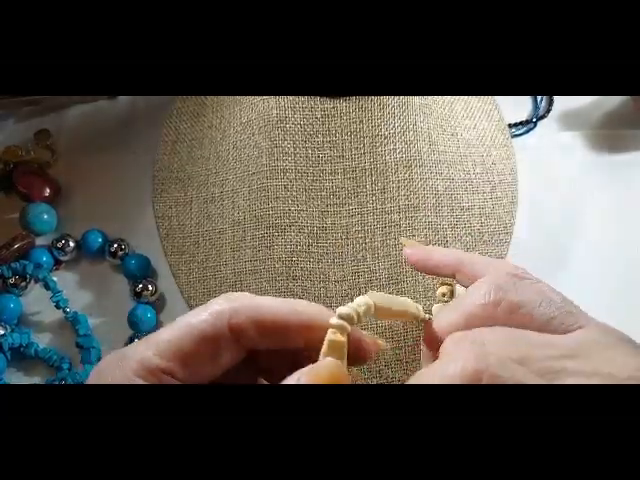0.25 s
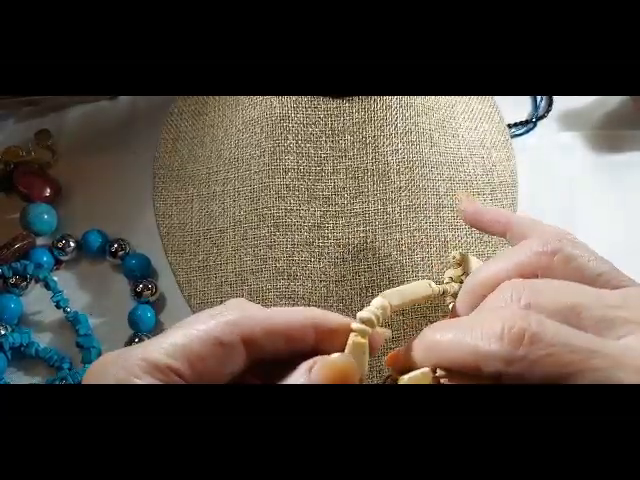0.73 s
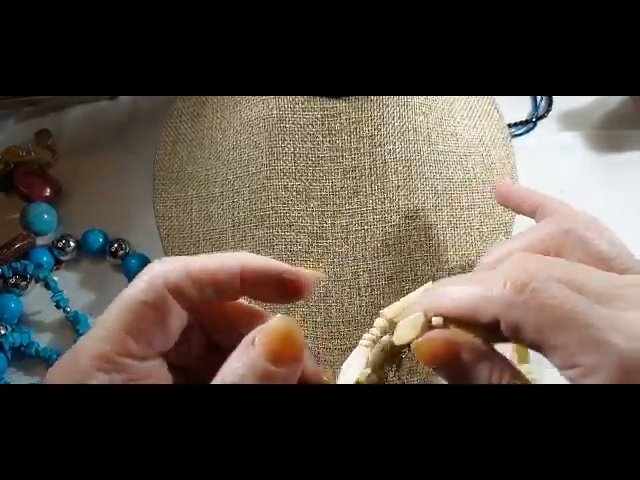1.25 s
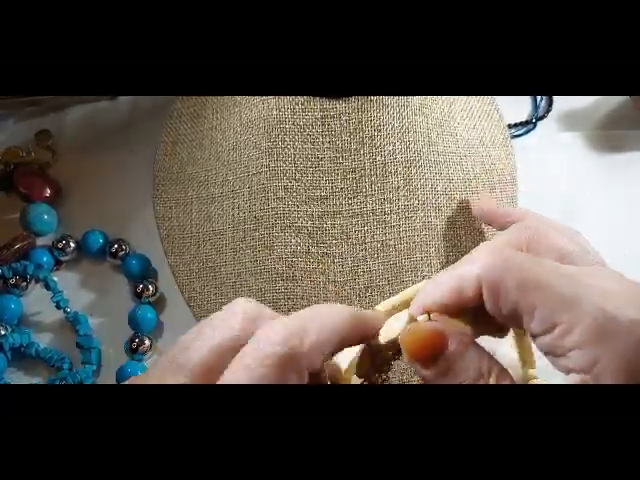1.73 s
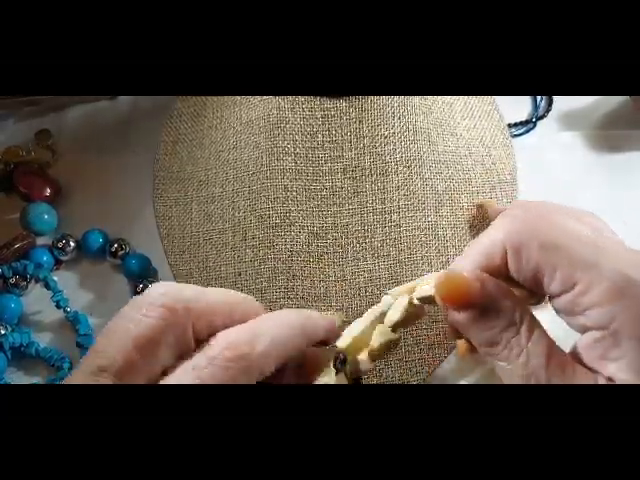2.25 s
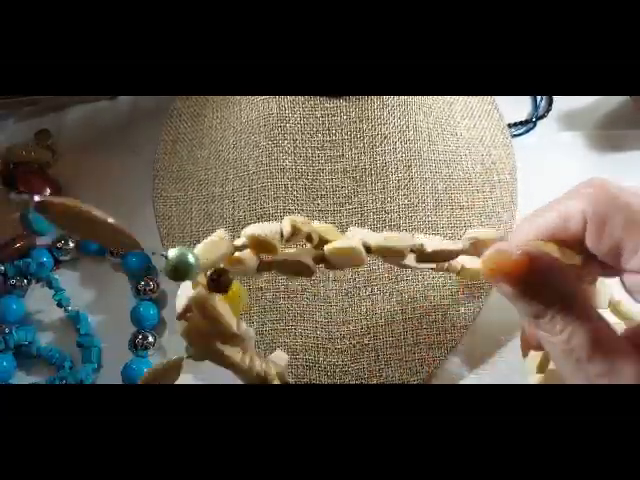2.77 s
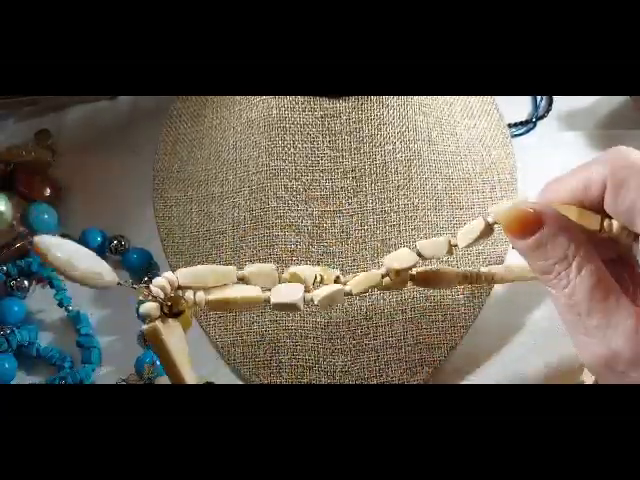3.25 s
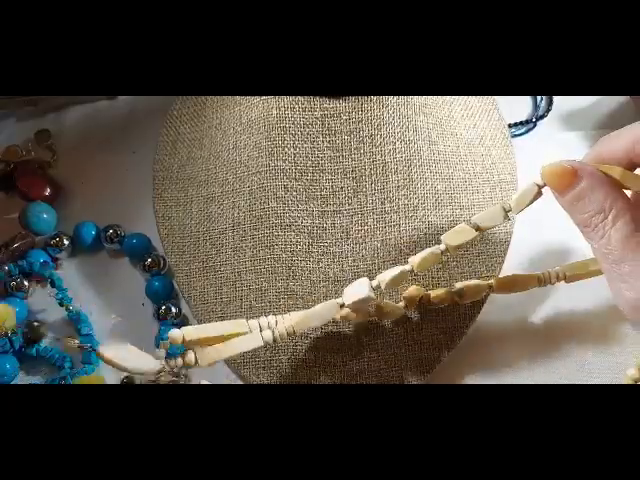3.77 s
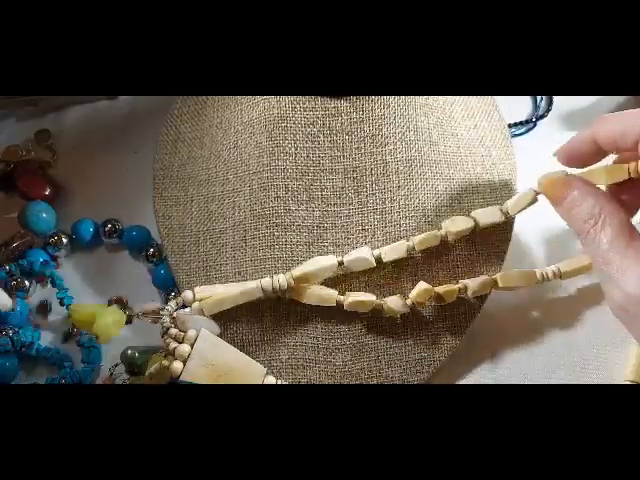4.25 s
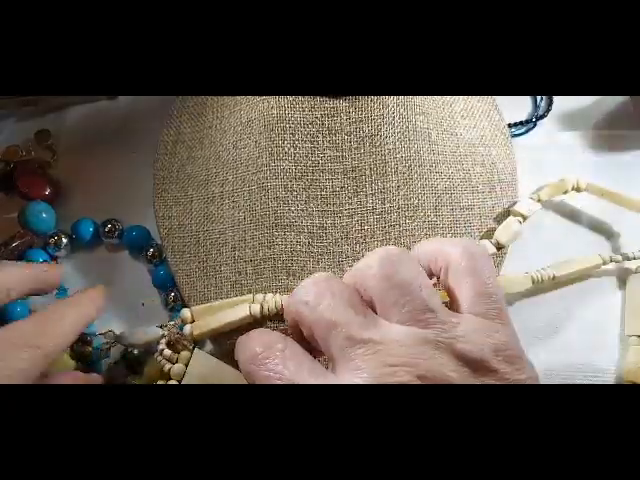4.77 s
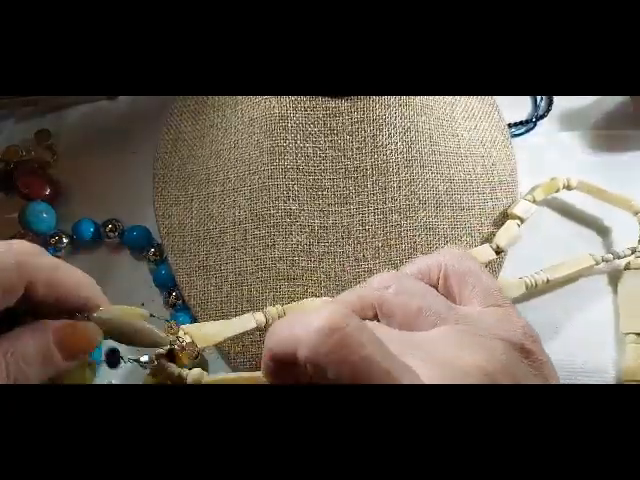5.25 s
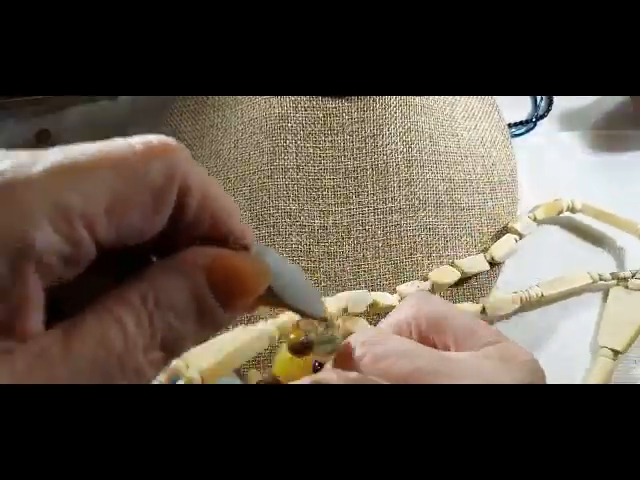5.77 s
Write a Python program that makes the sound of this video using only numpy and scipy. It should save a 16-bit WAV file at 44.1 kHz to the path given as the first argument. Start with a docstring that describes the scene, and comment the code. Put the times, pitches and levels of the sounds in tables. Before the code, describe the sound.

Close, light bead clicks build into bright rattling and a few dull table knocks as hands loosen a necklace, with machinery humming faintly.

```python
"""Untangling a bead necklace

Hands work a necklace loose on a table, close below two microphones, nearer the left one.
Each tug sets off a rattle of impacts: hard beads click and ring, heavy ones scrape and knock,
exciting the modes of the table top. Machines hum and the room rumbles underneath."""
import sys
import numpy as np
from scipy import signal
from scipy.fft import rfft, irfft, next_fast_len
from scipy.io import wavfile
from scipy.ndimage import uniform_filter1d, map_coordinates

SR = 44100
rng = np.random.default_rng(int(sys.argv[2]) if len(sys.argv) > 2 else 0)


def generate_wav(signal):
    """Clip the signal to [-1, 1] and save it as 16-bit WAV at the path in sys.argv[1]."""
    frames = np.transpose(np.atleast_2d(signal))
    scaled = np.clip(frames, -1, 1) * 32767
    pcm = np.round(scaled).astype(np.int16)
    wavfile.write(sys.argv[1], SR, pcm)


N = 265041
TIME_S = np.arange(N) / SR
EDGE_HZ, TOP_HZ = 15900, 17150  # passband edge, upper limit of the sound


def amp(db):
    return 10 ** (np.asarray(db) / 20)


def along(points, hz):
    """Interpolation of (hz, value) points on a logarithmic frequency axis."""
    knots_hz, values = np.transpose(points)
    return np.interp(np.log(hz + 1), np.log(knots_hz + 1), values)


def wobble(rate_hz):
    """Smooth random modulation: a spline through Gaussian knots."""
    knots = rng.standard_normal(int(N * rate_hz / SR) + 4)
    return map_coordinates(knots, [TIME_S * rate_hz])


def filtered(x, response):
    """Linear filtering: the spectrum is multiplied by a frequency response."""
    size = next_fast_len(N + SR // 4)
    return irfft(rfft(x, size) * response(np.fft.rfftfreq(size, 1 / SR)), size)[..., :N]


def coloured(x, spectrum):
    """Spectral shaping that conserves the power of white noise."""
    power = np.mean(amp(along(spectrum, np.linspace(0, SR / 2, num=400))) ** 2)
    return filtered(x, lambda hz: amp(along(spectrum, hz)) / np.sqrt(power))


def noise_field(spectrum):
    """Partial coherence: stereo noise of unit rms, most alike at both microphones in the bass."""
    # frequency_hz, left_right_correlation
    coherence = [(60, 0.9), (180, 0.72), (550, 0.71), (1650, 0.043), (4970, -0.066), (15000, -0.39)]

    def response(hz):
        angle = np.arccos(along(coherence, hz)) / 2
        return amp(along(spectrum, hz)) * [np.cos(angle), np.sin(angle)]

    mid, side = filtered(rng.standard_normal((2, N)), response)
    stereo = np.array([mid + side, mid - side])
    return stereo / np.sqrt(np.mean(stereo ** 2))


def scatter(x, t60_s, delay_s):
    """Diffuse reverberation: noise follows the source's power, stored and decaying exponentially."""
    fall = amp(-120 / (t60_s * SR))
    power = signal.lfilter([1 - fall], [1, -fall], np.mean(x ** 2, axis=0))
    delayed = np.roll(uniform_filter1d(power, size=40), round(delay_s * SR))
    return amp([[1.5], [-1.5]]) * np.sqrt(np.abs(delayed)) * rng.standard_normal((2, N))


def rattle_levels():
    """Incoherent addition: the tugs sum in power to a rattle level and its long-bead part, in dB."""
    # tugs on the string: peak_s, level_db, swell_s and decay_s (per 20 dB), long_share_db
    tugs = [(0.01, -63.5, .1, 0.19, -7), (.2, -71.5, 0.25, .15, 1), (.57, -75, 0.045, 0.13, 2.5),
            (1.02, -71, 0.075, 0.14, 0.5), (1.1, -65, .1, 0.17, -1), (1.211, -61.5, 0.12, 0.064, -2),
            (1.345, -58.5, .02, 0.12, -6), (1.525, -59.5, 0.12, 0.12, -4), (1.708, -65, 0.072, .15, -2),
            (1.802, -56.5, .08, 0.085, -9), (2.013, -54, 0.1, 0.073, -5.5),
            (2.331, -59, 0.097, 0.089, -5.5), (2.432, -46, .02, 0.13, -14.5),
            (2.6, -51.5, 0.21, 0.032, -3.5), (2.66, -51.5, 0.016, 0.36, -7.5),
            (2.814, -44.5, 0.074, 0.17, -5), (2.919, -40.5, 0.081, 0.19, -8),
            (3.087, -38.5, 0.27, 0.089, -7.5), (3.269, -52.5, 0.026, 0.072, 0),
            (3.524, -42.5, 0.097, 0.076, -12.5), (3.626, -44.5, .12, 0.067, -2.5),
            (3.763, -56.5, .15, .15, -13), (3.849, -47.5, 0.041, 0.077, -9),
            (3.975, -58.5, 0.011, .11, -5.5), (4.121, -46.5, 0.015, .03, -13.5),
            (4.216, -42, 0.033, 0.079, -5), (4.35, -59.5, .12, .1, -7), (4.516, -37, 0.08, 0.12, -7.5),
            (4.61, -48.5, .05, 0.2, -3.5), (4.751, -41, 0.077, 0.097, -10.5), (5.015, -42, 0.014, .04, -12),
            (5.11, -53, 0.13, 0.066, -9.5), (5.226, -51, 0.055, 0.064, -13), (5.33, -57.5, 0.14, .1, -10),
            (5.42, -53, .12, 0.092, -5), (5.517, -37.5, 0.13, 0.066, -5.5), (5.579, -42, .05, 0.047, -2.5),
            (5.745, -50, 0.3, 0.015, -8), (5.795, -44, 0.008, 0.12, -6), (5.91, -52, 0.057, 0.31, -5)]
    peak_s, level_db, swell_s, decay_s, long_share_db = np.transpose(tugs)[..., None]
    t = np.arange(0, N / SR + .01, .001)
    drop_db = 20 * np.where(t < peak_s, (peak_s - t) / swell_s, (t - peak_s) / decay_s)
    rest_db, long_linger = -90.5, 1.195

    def total(db):
        power = np.sum(amp(db) ** 2, axis=0) + amp(rest_db) ** 2
        return np.interp(TIME_S, t, 10 * np.log10(power))

    return total(level_db - drop_db), total(level_db + long_share_db - drop_db / long_linger)


def rumble(rattle_db):
    """Broadband vibration: room rumble adds in power to the shaking of the table by the tugs."""
    # two rumble spectra: frequency_hz, density_db
    low_band = [(15, -40.5), (28, -12), (45, -3.5), (85, -1), (105, -6.5), (135, -3.5), (160, -12),
                (222, -7.5), (250, -10.5), (305, -10), (340, -19.5), (450, -26), (700, -50)]
    upper_band = [(250, -31.5), (420, 1), (700, -5.5), (1100, -11), (2000, -17), (3000, -29), (5000, -38)]
    shake_power = np.abs(uniform_filter1d(amp(rattle_db) ** 2, round(.2 * SR)))
    low = np.sqrt(amp(-53.5) ** 2 + amp(-11) ** 2 * shake_power) * amp(.66 * wobble(6.1))
    upper = np.sqrt(amp(-74) ** 2 + amp(-26.5) ** 2 * shake_power) * amp(.5 * wobble(2.8))
    return low * noise_field(low_band) + upper * noise_field(upper_band)


def motor(start_hz=64.5, sag_hz_per_s=.9):
    """Amplitude and frequency modulation: a motor's low tone wavers and slowly sinks."""
    # envelope of the tone: time_s, level_db
    levels = [(0.0, -71), (0.06, -52), (0.72, -46.5), (0.89, -57), (1.32, -47), (1.89, -50.5), (2.39, -46),
              (2.53, -53), (3.11, -53), (3.18, -42.5), (3.3, -63), (3.36, -49.5), (3.8, -51), (3.9, -65),
              (3.95, -46), (4.44, -49.5), (4.65, -65), (4.84, -45), (4.97, -59.5), (5.12, -45.5),
              (5.27, -59), (6.01, -58.5)]
    level_db = np.interp(TIME_S, *np.transpose(levels)) + 1.67 * wobble(10)
    pitch_hz = start_hz - sag_hz_per_s * TIME_S + .84 * wobble(7)
    return np.sqrt(2) * amp(level_db) * np.sin(2 * np.pi * np.cumsum(pitch_hz) / SR)


def mains_hum(pitch_hz=119.6, beat_hz=1.966, beat_peak_s=3.02):
    """Beating: two hums close in pitch interfere, more deeply as the weaker one grows."""
    phase = 2 * np.pi * np.cumsum(pitch_hz + .5 * wobble(6.08)) / SR
    beat_phase = 2 * np.pi * beat_hz * (TIME_S - beat_peak_s)
    second = amp(-14 + 1.38 * TIME_S) * np.sin(phase + beat_phase)
    return amp(-50.5 + 1.35 * wobble(8)) * (np.sin(phase) + second)


def mat_rub(start_s=.136, hold_s=.042, rise_db_per_s=2500, fall_db_per_s=350):
    """Dry friction: one short rub on the mat, noise in two broad resonances."""
    # rub spectrum: frequency_hz, density_db
    mat = [(500, -28), (1000, -5), (1300, 1), (1600, -14), (2800, -30), (4100, -3), (4800, -12),
           (8000, -40)]
    t = TIME_S - start_s
    drop_db = rise_db_per_s * np.maximum(-t, 0) + fall_db_per_s * np.maximum(t - hold_s, 0)
    return amp(-67.5 - drop_db + 2.5 * wobble(63)) * noise_field(mat)


def table_knocks(attack_s=.00082):
    """Modal vibration: each blow of a heavy bead excites the table's damped modes at new strengths."""
    # blows: start_s, thud_db, body_db, knock_db, ring_db, decay_time_ratio
    blows = [(2.612, -52, -61, -72, -57, 0.9), (3.049, -54.5, -37, -49, -39.5, 0.62),
             (3.054, -43.5, -39, -42, -32, 0.7), (3.0639, -57, -24.5, -37, -20, 0.38),
             (3.067, -28, -35.5, -29, -29.5, 0.82), (3.079, -35, -43, -59, -41, 0.76),
             (3.602, -42, -50, -50, -54.5, 0.64), (3.617, -39, -52, -52, -51, 0.94),
             (4.176, -46, -51.5, -53, -53.5, 1.24), (4.226, -39.5, -34.5, -33.5, -41, 0.88),
             (4.235, -39.5, -35.5, -42, -58, 0.41), (4.535, -41, -57, -65, -55, 0.77),
             (4.585, -44, -51.5, -69, -55, 0.81), (4.758, -54, -50, -63, -85, 0.95),
             (5.52, -48, -57, -64, -65, 0.85), (5.868, -58, -37, -45, -43, 1.05),
             (5.919, -45, -45.5, -53, -51, 0.99), (6.0, -61, -51, -58, -46, 0.82)]
    # modes of the table top: pitch_hz, level_db, t60_s
    modes = [(135.3, 2, .12), (196, 3.5, 0.073), (394, 7, 0.061), (465, 0.5, 0.046), (558, -4.5, 0.051),
             (758, 1.5, 0.07), (995, -2.5, 0.037), (1123, 4.5, 0.035), (1211, -3.5, 0.052),
             (1360, -7.5, 0.042), (1930, -9.5, 0.054), (2310, -8.5, 0.032), (2900, -14.5, .03)]
    pitch_hz, level_db, t60_s = np.transpose(modes)[..., None]
    band = np.searchsorted([250, 650, 900], pitch_hz)  # thud, body, knock or ring
    out, t = np.zeros((2, N + SR)), np.arange(SR // 4) / SR
    for start_s, *band_db, decay_ratio in blows:
        strength, detune = rng.standard_normal((2, len(modes), 1))
        mode_db = np.take(band_db, band) - 3 + level_db + 2.46 * strength
        envelopes = amp(mode_db - 60 * t / (decay_ratio * t60_s))
        tones = envelopes * np.sin(2 * np.pi * pitch_hz * (1 + .013 * detune) * t)
        out[:, round(start_s * SR):][:, :len(t)] += tones.sum(axis=0) * (1 - np.exp(-t / attack_s))
    direct = out[:, :N] * amp([[.8], [-.8]])
    echo = scatter(direct, t60_s=.25, delay_s=.0076)
    echo_spectrum = [(80, -14), (150, 7), (1200, -9), (2500, -18), (5000, -71.5)]
    return direct + amp(-10) * coloured(echo, echo_spectrum)


def reflections(x):
    """Scattering: a quick return from table and hands, a longer one from the walls."""
    near = amp(-10) * scatter(x, t60_s=.027, delay_s=.0014)
    return near + amp(-17.5) * scatter(x, t60_s=.17, delay_s=.00446)


def contacts(start_s, level_db, pan_db, shapes):
    """Superposition of impacts; the longer path to the right microphone delays them by 9 samples."""
    index = np.round(start_s * SR).astype(int)[:, None] + np.arange(shapes.shape[-1])
    channels = []
    for shape, side, lag in zip(shapes, (.5, -.5), (0, 9)):
        gain = 4 * amp(level_db + side * pan_db) / np.linalg.norm(shape, axis=1)
        channels.append(np.bincount((index + lag).ravel(), (shape * gain[:, None]).ravel(), N)[:N])
    return np.array(channels)


def cracks(count, snap_db, snap_t60_s, wake_t60_s):
    """Impact transients: a snap and its noisy wake; shadowing weakens the snap on the right."""
    t = np.arange(256) / SR
    noise = rng.standard_normal((count, 2, len(t))).transpose(1, 0, 2)
    snap = amp(np.reshape(snap_db, (2, 1, 1)) - 60 * t / snap_t60_s)
    return np.sign(noise[0]) * snap + noise * amp(-60 * t / wake_t60_s)


def rings(pitch_hz, decay_s, spread):
    """Damped free vibration: a bead rings briefly with one main tone and a weaker one nearby."""
    t = np.arange(384) / SR
    offset, detune, linger = rng.random((len(pitch_hz), 3)).T[..., None]
    phase = 2 * np.pi * np.array([np.zeros_like(offset), offset - .5])  # left, right
    nearby_hz = np.minimum(pitch_hz[:, None] * np.exp(spread * (detune - .5)), EDGE_HZ)
    tone = np.sin(2 * np.pi * pitch_hz[:, None] * t + phase)
    tone += .5 * np.sin(2 * np.pi * nearby_hz * t - phase)
    t60_s = decay_s * (1.24 + linger)
    return tone * amp(-60 * t / t60_s) * (1 - t / t[-1])


def friction(long_rattle_db):
    """Sliding friction: long beads slip through the fingers, heavy ones scrape in the hardest tugs."""
    slide = amp(-80 + .8 * (long_rattle_db + 70) + 2.5 * wobble(70)) * rng.standard_normal((2, N))
    scrape = amp(-60 + 1.4 * (long_rattle_db + 45) + 2.9 * wobble(60)) * rng.standard_normal(N)
    return slide, scrape


def beads(rattle_db, long_rattle_db, tiny_count=3300):
    """Impact excitation: clear clicks and a dense random rattle sound small, long and heavy beads."""
    # clear clicks: start_s, level_db, left_over_right_db, long_share_db, long_pitch_hz
    clicks = [(0.013, -43.5, 13.5, -30, 7150), (0.0276, -50, 4, -16, 7050), (0.096, -53.5, 1, 0.5, 6200),
              (0.2992, -54.5, 2, -5, 7540), (0.5457, -54, 3, -12, 3400), (1.0877, -42, 3, -18, 4620),
              (1.1006, -37, 7, -7.5, 5400), (1.1359, -44.5, 3, -8, 5440), (1.1781, -27, 4, -20, 7340),
              (1.1817, -43, 1, -14, 5100), (1.2024, -35.5, 8, -8, 6300), (1.2141, -38, 6, -9, 6370),
              (1.3377, -38, 5, -19, 6800), (1.3529, -47, 3, -12, 5470), (1.4476, -44, 4, -13, 4600),
              (1.4915, -42, 7, -20, 5060), (1.5199, -48, 7, -21, 7480), (1.5266, -47, 8, -13, 7140),
              (1.6573, -45, 5, -10, 6900), (1.684, -39, 1, -20, 7470), (1.702, -40, 1, -13, 5640),
              (1.712, -44, 0, -11.5, 7310), (1.7721, -46, 3, -10.5, 6940), (1.9589, -44, 2, -9, 7250),
              (1.9746, -43, 4, -12, 7140), (2.0044, -44.5, 5, -8.5, 4530), (2.0126, -36.5, 1, -9.5, 5400),
              (2.0254, -46, 4, -9, 7160), (2.0522, -49, 1, -11, 4810), (2.2463, -45, 6, -23, 7490),
              (2.2627, -42, 1, -24, 2400), (2.3048, -49, -1, -20, 7490), (2.3263, -42, 5, -20, 7080),
              (2.3342, -33, 5, -20, 7240), (2.4237, -29, 7, -24, 6700), (2.4284, -35, -4, -16, 6660),
              (2.436, -34, 0, -19, 7350), (2.5077, -36.5, 1, -8, 7060), (2.5198, -27.5, 4, -19, 7120),
              (2.567, -37, 6, -19, 4510), (2.5919, -29, 10, -17, 5400), (2.651, -35.5, 7, -12, 4870),
              (2.6546, -28.5, 2, -17.5, 4820), (2.745, -34.5, 10, -17, 7040), (2.7507, -30, 2, -26, 5180),
              (2.7735, -32, 8, -26, 7070), (2.7895, -32.5, 9, -22, 4640), (2.7997, -28, 6, -25, 5340),
              (2.8114, -25.5, 5, -17, 7190), (2.8195, -29, 7, -14, 3870), (2.835, -27, 2, -25, 4870),
              (2.841, -26, 4, -13.5, 4830), (2.8906, -26.5, 1, -14.5, 7410), (2.8994, -28, 8, -23, 7160),
              (2.911, -25, 0, -13, 6920), (2.9197, -21, 9, -16, 6120), (2.9258, -24, 9, -25, 7260),
              (2.94, -26.5, 12, -12, 7490), (2.972, -28, 6, -12, 7540), (2.9972, -21.5, 8, -25, 6200),
              (3.0343, -33, 11, -20, 5030), (3.042, -29, 7, -15, 6290), (3.0749, -30, -1, -11, 5670),
              (3.0798, -28, 7, -18, 7170), (3.0873, -16.5, 9, -15.5, 6800), (3.0946, -30, 9, -16, 5000),
              (3.1003, -32, 1, -10, 6900), (3.111, -27, 7, -17, 6890), (3.1192, -23.5, 6, -15.5, 7300),
              (3.1992, -25, 2, -23.5, 5030), (3.2522, -38, 5, -14, 6300), (3.2558, -31, 9, -15, 6460),
              (3.262, -33, 11, -22, 6100), (3.2706, -33, 3, -25, 6120), (3.3089, -36, 9, -21, 5030),
              (3.4274, -34, 7, -18, 7250), (3.4744, -38, 12, -27, 4970), (3.4866, -33, 5, -23, 5600),
              (3.5145, -25.5, 4, -15, 7300), (3.5187, -21, 3, -18, 7100), (3.5648, -26, 2, -22, 6800),
              (3.575, -29, -1, -14, 5490), (3.582, -35, 8, -17, 6210), (3.5978, -22, 1, -18.5, 5900),
              (3.6024, -24, 2, -27, 6300), (3.6113, -32, 0, -10, 4300), (3.617, -25, 7, -19, 7490),
              (3.6272, -20, 8, -12, 4630), (3.6305, -29, 3, -14, 3490), (3.6392, -36, 3, -15, 6090),
              (3.6469, -31, 6, -25, 7130), (3.662, -21, 0, -18, 5530), (3.7057, -36.5, 6, -32, 4660),
              (3.7407, -37, 4, -25, 5430), (3.75, -39, 3, -26, 7050), (3.7702, -40, 15, -29, 5490),
              (3.833, -38, 9, -27, 6340), (3.8413, -38, 7, -22, 6440), (3.8494, -34, 10, -22, 6520),
              (3.8603, -29, 11, -21, 6510), (3.9043, -43.5, 7, -17, 5790), (3.9674, -34.5, 10, -4.5, 7300),
              (4.1144, -35, 5, -20, 5490), (4.1229, -36, 5, -16, 6750), (4.1696, -29, 3, -14.5, 6160),
              (4.2112, -20.5, 2, -16, 3280), (4.215, -16, 10, -15, 3230), (4.2177, -24, 8, -14, 4260),
              (4.223, -27, 6, -20, 4600), (4.2651, -25, 2, -29, 7030), (4.2706, -34, 3, -16, 4950),
              (4.3068, -40, 10, -24, 6200), (4.3156, -41, 6, -16, 5260), (4.338, -27, 5, -30, 7000),
              (4.3551, -38.5, 13, -27, 7200), (4.4552, -35, 9, -20, 6610), (4.4666, -37, 6, -18, 5360),
              (4.4729, -27, 8, -5, 6150), (4.487, -34, 3, -15, 3530), (4.4934, -28.5, 11, -17, 7080),
              (4.5084, -24, 13, -26, 4800), (4.5145, -30, 9, -17, 5880), (4.5173, -25, 8, -28, 7460),
              (4.5232, -26, 9, -13.5, 7450), (4.5395, -29, 7, -13, 6800), (4.543, -28.5, 6, -7, 4710),
              (4.5882, -31.5, 15, -1.5, 3430), (4.5974, -26, 8, -15, 6970), (4.6028, -41, 7, -15, 5350),
              (4.6184, -28, 8, -11, 3100), (4.7376, -25, 7, -25, 5280), (4.7435, -26, 9, -20, 5170),
              (4.7476, -25, 1, -19, 7070), (4.75, -28.5, 10, -20, 7380), (4.7595, -17.5, 13.5, -18, 7320),
              (4.7618, -30, 3, -16, 7200), (4.769, -26, 6, -16, 6780), (4.7733, -26, 1, -22, 5910),
              (4.7766, -32, 4, -12, 6030), (4.7851, -33.5, 2, -16, 4970), (4.9253, -43.5, 14, -25, 7190),
              (4.9546, -43.5, 13, -8.5, 7110), (4.9957, -32, 4, -16.5, 5800), (5.0014, -36, 7, -23, 5110),
              (5.0062, -39, 6, -16, 5540), (5.014, -39.5, 7, -1.5, 6670), (5.017, -26, 2, -10, 6800),
              (5.0208, -40, 2, -13, 5900), (5.0568, -43, 4, -15, 7240), (5.088, -37.5, 11, -23, 6260),
              (5.2263, -38, 5, -23, 7350), (5.2322, -29.5, 9, -21.5, 5370), (5.2753, -31.5, 7, -26, 4640),
              (5.3044, -40, 10, -15, 7490), (5.329, -38, 9, -14, 7490), (5.4482, -16, 11.5, -28, 5280),
              (5.4599, -26, 9, -21, 7440), (5.4686, -29, 9, -13, 3810), (5.4968, -27, 2, -6, 3320),
              (5.5012, -21.5, 7, -17, 6650), (5.5153, -22, 7, -6.5, 4780), (5.5185, -25.5, 7, -7, 4900),
              (5.5226, -19, 7, -10, 4900), (5.528, -30, 2, -10, 4800), (5.5385, -28, 6, -10, 4500),
              (5.5618, -21.5, 6, -12, 5100), (5.571, -31, 2, -13, 2860), (5.5776, -33, 9, -14, 4980),
              (5.5846, -30, 7, -19, 3050), (5.645, -30, 3, -11.5, 6340), (5.701, -31.5, 5, -10.5, 4730),
              (5.786, -26.5, 9.5, -9, 4750), (5.7958, -28.5, 12, -13, 4900), (5.8089, -35, 6, -23, 7100),
              (5.8163, -36, 4, -21, 6310), (5.8233, -31, 5, -10, 7470), (5.8408, -28, 0, -12, 4450),
              (5.8968, -27, 3, -23, 7300), (5.9229, -30.5, 1, -11.5, 6980), (5.9466, -29.5, 8, -10.5, 5500)]
    # spectra of small, long and heavy beads: frequency_hz, density_db
    small_spectrum = [(1500, -72), (4000, -33.5), (7500, -6), (10000, -7), (12500, 4.5), (15000, -5),
                      (17000, -1)]
    long_spectrum = [(900, -39.5), (2200, -14), (3300, -5.5), (5000, 0.5), (7000, 1), (10000, -1.5),
                     (17000, -25)]
    heavy_spectrum = [(700, -45), (1300, -14), (2100, -3), (2800, 1.5), (3600, -2.5), (6000, -37)]
    start_s, level_db, pan_db, long_share_db, long_hz = np.transpose(clicks)

    # tiny contacts join the clicks, their levels scattered about the rattle level
    when, strength, side, share, pitch = rng.random((tiny_count, 5)).T
    at = (when * N).astype(int)
    strength_db = -4.2 * np.log(strength + .0098) - 3.5
    tiny_long_db = long_rattle_db[at] + strength_db - 5 + 9 * (share - .5)
    start_s = np.append(start_s, when * N / SR)
    pan_db = np.append(pan_db, 5 + 8 * (side - .5))
    long_db = np.append(level_db + long_share_db, tiny_long_db)
    long_hz = np.append(long_hz, 4800 * np.exp(1.02 * (pitch - .5)))
    level_db = np.append(level_db, rattle_db[at] + strength_db)
    count = len(start_s)

    bright = contacts(start_s, level_db, pan_db, cracks(count, [14, 11], .0006, .009))
    small_hz = 11500 * np.exp(.618 * (rng.random(count) - .5))
    glassy = contacts(start_s, level_db - 9, pan_db, rings(small_hz, decay_s=.039, spread=.4))
    woody = contacts(start_s, long_db + 4.5, .34 * pan_db, cracks(count, [6, 3], .0013, .02))
    ring = contacts(start_s, long_db + 1.5, .34 * pan_db, rings(long_hz, decay_s=.029, spread=.795))
    force_db = uniform_filter1d(rattle_db, size=2000)[(start_s * SR).astype(int)] + 44
    heavy_db = long_db - 5.5 + .52 * force_db  # a harder tug also moves the heavy beads
    clack = contacts(start_s, heavy_db, .18 * pan_db, cracks(count, [5, 4], .0041, .021))
    slide, scrape = friction(long_rattle_db)

    heavy = coloured(scrape + clack + reflections(clack), heavy_spectrum)
    small = coloured(bright + reflections(bright), small_spectrum)
    long = coloured(slide + woody + reflections(woody) + 1.74 * reflections(ring), long_spectrum)
    return ring + glassy + heavy + small + long


def scene():
    """Superposition: the necklace sounds over a background a little stronger on the right."""
    rattle_db, long_rattle_db = rattle_levels()
    handling = beads(rattle_db, long_rattle_db) + table_knocks() + mat_rub()
    background = motor() + mains_hum() + rumble(rattle_db)
    return handling + background * amp([[-.9], [.9]])


def record(dry):
    """Self-noise and band limiting: the microphones add faint hiss and the top treble is cut."""
    # microphone noise: frequency_hz, density_db
    hiss_spectrum = [(500, -8), (2500, -2.5), (5000, -13), (8500, -20), (11000, -0.5), (14200, -6.5),
                     (15000, 1.5), (15700, 2), (17000, -1.5)]
    hiss = amp(-90) * coloured(rng.standard_normal((2, N)), hiss_spectrum)
    return filtered(dry + hiss, lambda hz: np.where(hz < EDGE_HZ, 1, amp(-31.5)) * (hz < TOP_HZ))


dry = scene()
out = record(dry)
generate_wav(out)
```